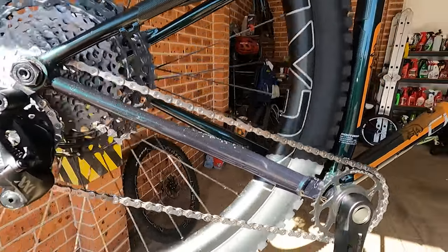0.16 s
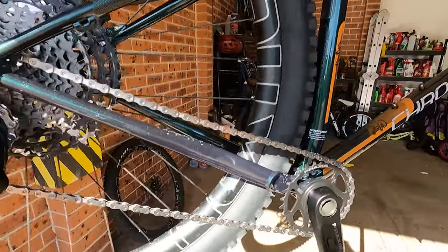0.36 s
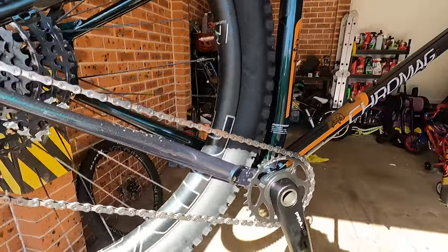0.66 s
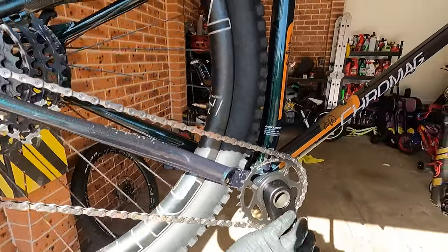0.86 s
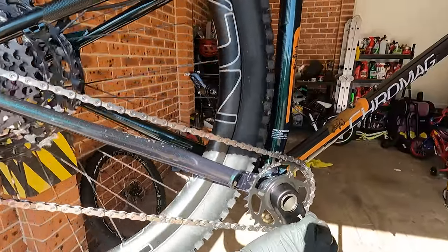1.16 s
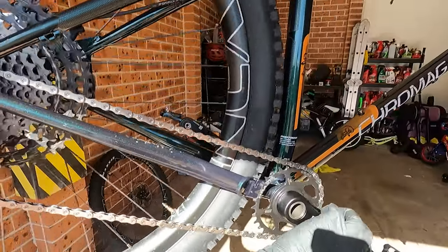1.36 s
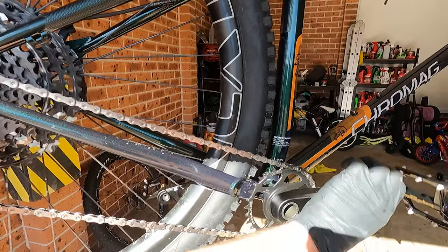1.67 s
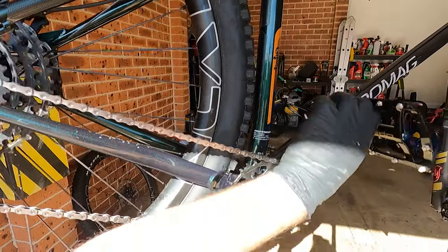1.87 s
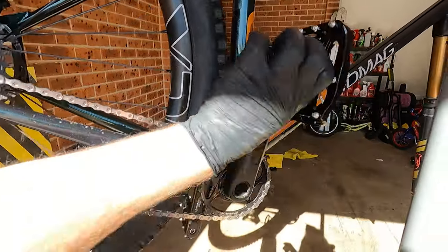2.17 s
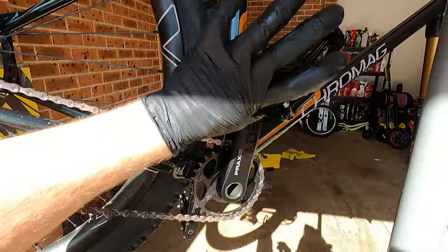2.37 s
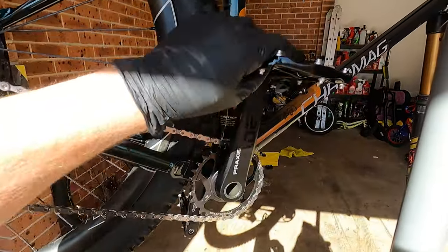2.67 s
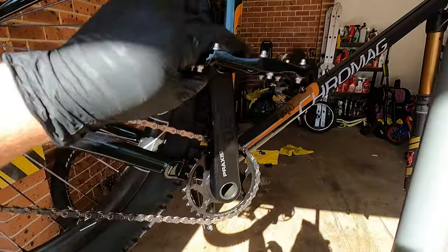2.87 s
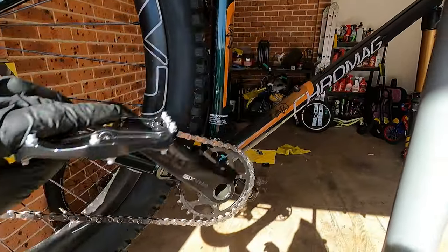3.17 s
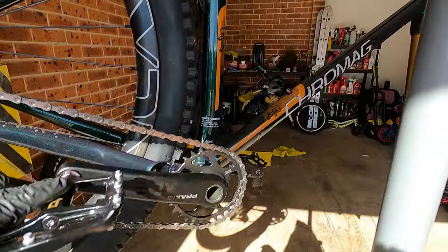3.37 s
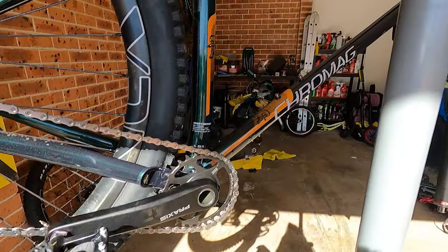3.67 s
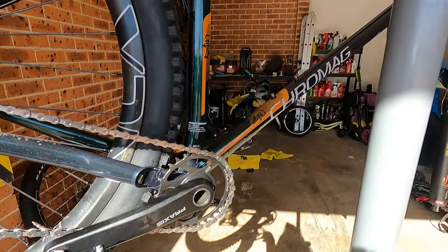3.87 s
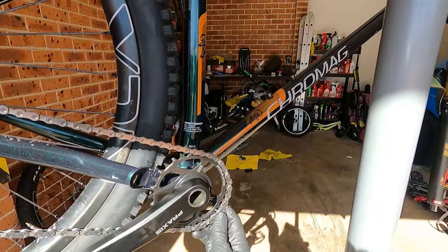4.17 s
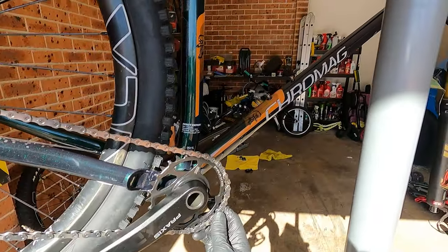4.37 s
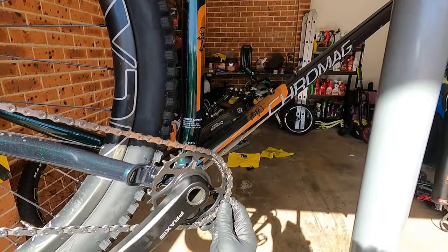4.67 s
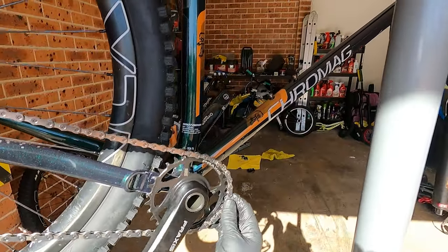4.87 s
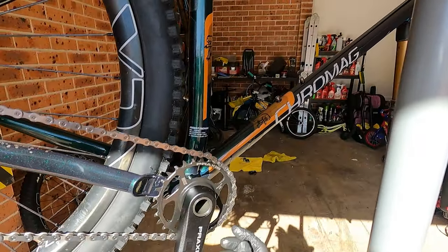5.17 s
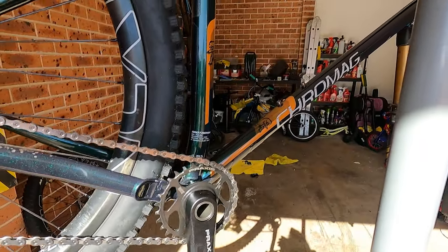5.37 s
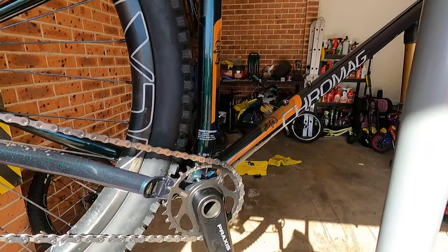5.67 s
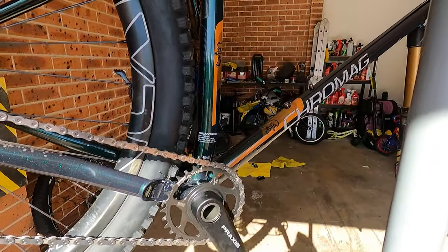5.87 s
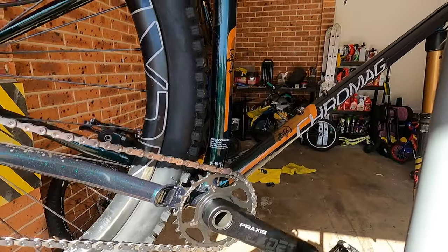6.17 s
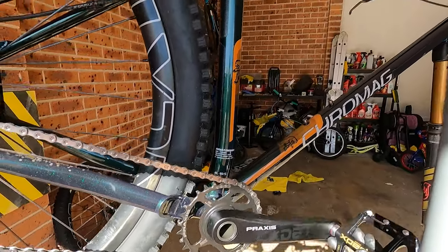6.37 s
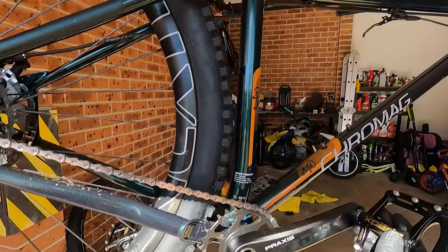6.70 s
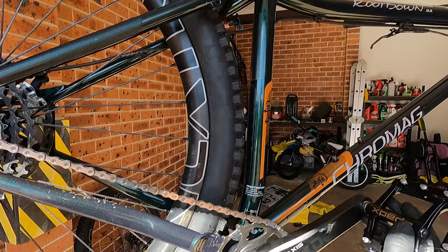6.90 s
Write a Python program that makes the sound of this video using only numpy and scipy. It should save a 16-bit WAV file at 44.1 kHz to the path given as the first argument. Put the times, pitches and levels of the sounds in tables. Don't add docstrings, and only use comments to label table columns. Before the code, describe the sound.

A bicycle hub is heard close up in stereo at a garage mouth. Bright, hard metallic clicks start at once, buzzing at about 60 to 80 a second and slowing by 0.6 s. Slower separate clicks, around 20 a second, follow until 1.25, then a long fast purr runs to 2.4, with a dull knock near 2.2. A gap holds only tiny ticks around 2.75. From 2.85 the clicking speeds up, then slows by 3.8; sparse clicks continue to 4.4. After another pause, strokes resume at 4.67, 5.16 and 5.7 at moderate speed, with a low frame hum at 5.2. The last run from 6.04 is faster and closer, slackening by 7.0. Soft low bumps and breezy grip rumble increase after 4.8, heaviest near 6.5. Short garage reverberation and faint street air lie beneath.

```python
import sys
import numpy as np
from scipy import signal
from scipy.fft import rfft, irfft
from scipy.io import wavfile
from scipy.ndimage import uniform_filter1d

SR = 44100
rng = np.random.default_rng(int(sys.argv[2]) if len(sys.argv) > 2 else 0)


def output_pcm(signal):
    pcm = np.clip(np.atleast_2d(signal).T, -1, 1) * 32767
    wavfile.write(sys.argv[1], SR, np.round(pcm).astype(np.int16))


def makeup_ratio(level_db):
    decades = np.asarray(level_db, float) / 20
    return 10 ** decades


N = 310464
BAND_EDGES_HZ = 320 * 2 ** np.arange(0, 6.1, 1 / 3)

# (frequency [Hz], density [dB per Hz])
STREET_SPECTRUM = [(88, -67), (150, -13), (244, -12.5), (283, -15.5), (565, -12.5), (790, -15),
                   (1280, -11.5), (4830, -26), (13000, -51)]
# (time [s], level [dB])
AIR_SWELL = [(0, -1), (2.42, 6.5), (2.66, 4), (2.72, 0), (3.5, 9), (4.45, 5), (4.64, 3), (7.04, 5)]
# (time [s], level [dB])
GRIP = [(0, -54), (.17, -53), (.4, -50.5), (3.37, -54.5), (3.47, -51), (3.85, -47), (3.95, -56.5),
        (4.68, -51.5), (4.85, -38.5), (5.08, -43.5), (5.5, -48.5), (5.8, -37.5), (6.2, -47.5),
        (6.33, -33.5), (6.53, -30), (6.62, -41.5), (6.8, -35.5), (7.04, -38.5)]
# (frequency [Hz], side against mid [dB])
NOISE_WIDTH = [(30, -4.5), (125, -2.5), (250, -5), (600, -11), (5000, -11), (13000, -4)]
# (time [s], peak [dB], frequency [Hz], push + or pull - [ratio])
BUMPS = [(4.781, -20, 84, 0.79), (5.197, -16.5, 44.4, 0.57), (5.583, -23.5, 51.3, 0.82),
         (5.682, -17, 50, -0.44), (5.805, -24, 41.6, 0.83), (6.315, -19, 117, -0.8),
         (6.318, -14.5, 209, 0.69), (6.517, -18.5, 260, 1), (6.513, -6.5, 60.6, -0.53),
         (6.784, -15.5, 42.5, 0.84), (7.019, -12.5, 139, 0.96)]
# (time [s], peak [dB], knock [dB])
JOLTS = [
    (0.498, -36, -4.5),
    (1.42, -40, -4),
    (2.178, -50, 14.5),
    (3.968, -40, -20),
    (5.201, -31, -4),
    (5.722, -32, 0),
    (6.313, -34.5, -25),
    (6.516, -38.5, -13),
    (7.02, -32, -15.5),
]
# (frequency [Hz], level [dB], t60 [s])
FRAME_MODES = [(143.8, 1, 0.91), (298.6, -9.5, 0.35), (452, -12.5, 0.29)]
# (frequency [Hz], t60 [s])
GARAGE_T60 = [(700, 0.52), (2000, 0.68), (5000, 0.6), (9000, 0.51), (14000, 0.35)]
# (time [s], nearness [dB], turn from -1 rim-on to 1 face-on [ratio])
VIEW = [(0, 0.5, 1.4), (.3, 0, 0.52), (.55, 1.7, 0.34), (1.2, 0.1, -0.48), (1.7, 1.25, -0.63),
        (2.12, -0.1, 0), (2.38, -4, 1.04), (2.8, -3.5, 1.1), (3.15, 1.05, -0.62), (3.65, -0.7, 1),
        (4.2, 2, 0.39), (4.42, -4, 1.26), (4.66, 0.3, 0.23), (5.1, 0.5, 0.28), (5.4, .5, 0.51),
        (5.9, 0.5, 0.23), (6.62, 5, -0.25), (6.9, 4.5, 0.94)]
# (frequency [Hz], t60 [s])
HUB_MODES = [(960, .08), (1010, .05), (1617, .08), (1735, .045), (1810, .11), (1860, .05), (1927, .09),
             (2035, .08), (2101, .12), (2423, .12), (2466, .12), (2530, .12), (2596, .13), (2699, .07),
             (2852, .13), (3043, .1), (3548, .08), (4285, .08), (5620, .06), (5797, .065), (5857, .05),
             (6670, .04), (7870, .05), (8850, .04), (10590, .04), (12000, .008)]
HUB_MODE_DB = [-14.5, -11, -33, -6, -12, -9.5, -10, -13.5, -9.5, -23, -14, -25.5, -23, -15, -25.5, -15, -9,
               -18.5, -11, -9.5, -16, -9.5, -12, -10, -38, 3]
# (frequency [Hz], density [dB per Hz])
SNAP_SPECTRUM = [(400, -20.5), (850, -18.5), (970, -7.5), (1300, -13.5), (1800, 2), (2240, -3.5), (2600, 3),
                 (3250, -5), (4600, 4), (5450, -2), (5800, 2), (6250, -2.5), (12000, -9.5), (15600, -26)]
# (frequency [Hz], t60 [s])
SNAP_T60 = [(700, 0.25), (2000, 0.39), (4500, 0.091), (8000, 0.099), (14000, 0.025)]
# (frequency [Hz], side [dB])
SNAP_SPREAD = [(800, -8), (4000, -20), (8000, -11), (11000, -9), (15000, 3.5)]
# (time [s], peak [dB])
TICKS = [
    (2.7373, -62),
    (2.7544, -64),
    (2.7665, -46.5),
]
# (time [s], teeth since stroke began [count])
FIRST_TURN = [
    [(.0012, 0), (.0769, 4), (.172, 10), (.3395, 23), (.4002, 28), (.4816, 34), (.5451, 37), (.5767, 38),
     (.6232, 39)],
    [(.6495, 0), (.6732, 1), (.7592, 3), (.8432, 4), (.9088, 5), (1.0512, 7), (1.1203, 8), (1.1696, 9),
     (1.2454, 11)],
    [(1.2723, 0), (1.3512, 4), (1.4288, 9), (1.6263, 24), (1.8084, 37), (2.1436, 61), (2.1589, 62),
     (2.3295, 68), (2.3797, 69)],
]
SECOND_TURN = [
    [(2.8391, 0), (2.8707, 1), (2.9305, 3), (2.9554, 4), (3.0022, 6), (3.1923, 17), (3.3508, 27),
     (3.7328, 43), (3.772, 44)],
    [(3.8297, 0), (3.8908, 1), (3.9564, 2), (4.1167, 5), (4.2457, 7), (4.3127, 8), (4.4073, 9)],
]
THIRD_TURN = [
    [(4.667, 0), (4.7412, 1), (4.7858, 2), (4.8177, 3), (4.8456, 4), (4.9004, 6), (5.0651, 12),
     (5.0985, 13), (5.1303, 14)],
    [(5.1568, 0), (5.1823, 2), (5.2005, 3), (5.2495, 6), (5.3412, 10), (5.415, 13), (5.5029, 16),
     (5.5483, 17), (5.6031, 18)],
    [(5.6893, 0), (5.7502, 2), (5.8301, 5), (5.8812, 7), (6.0025, 11)],
    [(6.039, 0), (6.0968, 2), (6.1785, 6), (6.4538, 21), (6.4732, 22), (6.6433, 29), (6.9287, 37),
     (6.9612, 38), (7.0321, 40)],
]
STROKE_DB = [-1.4, .5, 0.022, 0.61, -1.24, -0.12, 1.7, 0.5, -1.76]
# (frequency [Hz], left minus right [dB])
MIC_TILT = [(60, -1.0), (250, -2.5), (500, 0.0), (950, 0.0), (2380, 0.5), (5980, 1.5), (9500, 2.5),
            (14000, 0.0)]
# (frequency [Hz], gain [dB])
TOP_CUT = [(15650, 0), (15900, -45)]
# (lower edge [Hz], threshold [dB])
TOP_GATES = [(14000, -72), (12700, -74)]


def in_time(rows):
    s, *columns = np.transpose(rows)
    return [np.interp(np.arange(N) / SR, s, c) for c in columns]


def at_hz(points, hz):
    table_hz, value = np.array(points).T
    return np.interp(np.log(hz), np.log(table_hz), value)


def rms_one(x):
    return x / np.sqrt(np.mean(x ** 2) + 1e-20)


def coloured(x, spectrum):
    x = np.asarray(x)
    size = x.shape[-1]
    hz = np.maximum(np.arange(size // 2 + 1) * SR / size, 1)
    return irfft(rfft(x) * makeup_ratio(at_hz(spectrum, hz)), size)


def lift(x, band, gain_db):
    return x + coloured(x, band) * (makeup_ratio(gain_db) - 1)


def train(at, size):
    return np.bincount(at.ravel(), size.ravel(), N)


def ring(impulses, hz, t60_s):
    r = makeup_ratio(-60 / (t60_s * SR))
    w = 2 * np.pi * hz / SR
    return signal.lfilter([0, np.sin(w)], [1, -2 * r * np.cos(w), r * r], impulses + 1e-18)


def dying_noise(t60s, size, channels):
    white = rng.standard_normal((2, channels, size))
    t = np.arange(size) / SR
    out = 0
    for k, (low, high) in enumerate(zip(BAND_EDGES_HZ, BAND_EDGES_HZ[1:])):
        bandpass = signal.butter(2, [low, high], "band", fs=SR, output="sos")
        band = signal.sosfilt(bandpass, white[k % 2])
        out = out + band * makeup_ratio(-60 * t / at_hz(t60s, np.sqrt(low * high)))
    return out / np.sqrt(np.sum(out ** 2, axis=1, keepdims=True))


def pair_noise(spectrum):
    mid, side = coloured(rng.standard_normal((2, N)), spectrum)
    side = coloured(side, NOISE_WIDTH)
    return rms_one(np.array([mid + side, mid - side]))


def street():
    return makeup_ratio(-57 + in_time(AIR_SWELL)[0]) * pair_noise(STREET_SPECTRUM)


def lumps():
    knots = rng.standard_normal(200)
    return np.interp(np.arange(N) / SR * 12, np.arange(200), knots)


def rumble():
    lump_db = 2.5
    grip_db, = in_time(GRIP)
    deep = pair_noise([(12, 5.0), (25, 3.0), (48, 7.5), (90, -3.0), (140, -13.5), (300, -72)])
    upper = pair_noise([(60, -19), (110, -8), (155, 5), (250, -4.5), (400, -6.5), (800, -63), (2000, -70)])
    deep_db = grip_db + 5.5 + lump_db * lumps()
    upper_db = -54 + 0.34 * (grip_db - grip_db.min()) + .5 * lump_db * lumps()
    return makeup_ratio(deep_db) * deep + makeup_ratio(upper_db) * upper


def bumps():
    out = np.zeros(N)
    for s, peak_db, hz, way in BUMPS:
        push = train(np.array([int(s * SR)]), way * makeup_ratio([peak_db]))
        out += ring(push, hz, 3.5 / hz)
    return out


def frame():
    s, peak_db, knock_db = np.transpose(JOLTS)
    at = (s * SR).astype(int)
    hum = sum(ring(train(at, makeup_ratio(peak_db + db - 4.5)), hz, t60_s) for hz, db, t60_s in FRAME_MODES)
    puff = signal.lfilter([1], [1, -makeup_ratio(-60 / (.08 * SR))], train(at, makeup_ratio(peak_db + knock_db)))
    bandpass = signal.butter(2, [150, 900], "band", fs=SR, output="sos")
    knock = signal.sosfilt(bandpass, rng.standard_normal(N))
    return hum + puff * rms_one(knock)


def garage(x):
    tail = dying_noise(GARAGE_T60, size=40000, channels=2)
    tail = np.pad(tail, ((0, 0), (300, 0)))
    return makeup_ratio(-11) * signal.fftconvolve(x[None], tail, axes=1)[:, :N]


def drops(stroke):
    s, teeth = np.transpose(stroke)
    tooth = np.arange(teeth[-1] + 1)
    slope = np.gradient(s, teeth, edge_order=2)
    i = np.minimum(np.searchsorted(teeth, tooth, "right") - 1, len(s) - 2)
    step, gap = np.diff(teeth)[i], np.diff(s)[i]
    u = (tooth - teeth[i]) / step
    bend = (1 - u) * (slope[i] * step - gap) - u * (slope[i + 1] * step - gap)
    at = s[i] + u * gap + u * (1 - u) * bend
    return np.transpose([at, 1 / np.gradient(at)])


def clicks():
    drop_db, db_per_doubling = -24.5, 1
    scatter_db, scatter_s = .7, .0003
    strokes = [drops(stroke) for stroke in FIRST_TURN + SECOND_TURN + THIRD_TURN]
    s, rate = np.concatenate(strokes).T
    speed = np.log2(rate / 40)
    scatter = rng.standard_normal((2, len(s)))
    force_db = np.repeat(STROKE_DB, [len(p) for p in strokes])
    level_db = drop_db + force_db + db_per_doubling * speed + scatter_db * scatter[0]
    dropped = list(zip(s + scatter_s * scatter[1], level_db))
    return dropped, in_time(np.transpose([s, speed]))[0]


def contacts(events, spread_s, bounce_db, count):
    s, level_db = np.transpose(events)
    draw = rng.random((len(s), 3 * count)).reshape(-1, 3, count)
    late_s = spread_s * -np.log(1 - draw[:, 0])
    late_s[:, 0] = .0009
    size = makeup_ratio(bounce_db + 2 * draw[:, 1]) * np.sign(draw[:, 2] - .5)
    size[:, 0] = 1
    size *= makeup_ratio(level_db[:, None]) / np.linalg.norm(size, axis=1, keepdims=True)
    at = ((s[:, None] + late_s - .0004) * SR).astype(int)
    return np.clip(at, 0, N - 1), size


def sprockets(at, size):
    swell_s, crack_db, teeth_per_position = .0006, 27.5, 3
    crack_t60 = [(700, .022), (4000, .014), (15000, .022)]
    response = makeup_ratio(26) * dying_noise(SNAP_T60, size=9000, channels=8)
    response[:, :1500] += makeup_ratio(crack_db) * dying_noise(crack_t60, size=1500, channels=8)
    response *= 1 - np.exp(-np.arange(9000) / (swell_s * SR))
    response[:, 40] += makeup_ratio(11)
    away = (np.arange(len(at))[:, None] / teeth_per_position - np.arange(8) + 4) % 8 - 4
    share = np.cos(np.pi / 2 * np.clip(away, -1, 1))
    return sum(signal.fftconvolve(train(at, size * share[:, [k]]), response[k])[:N] for k in range(8))


def radiated(x, spectrum):
    hz = np.maximum(np.arange(2049) * SR / 4096, 1)
    cepstrum = irfft(np.log(makeup_ratio(at_hz(spectrum, hz))))
    cepstrum[1:2048] *= 2
    cepstrum[2049:] = 0
    response = irfft(np.exp(rfft(cepstrum)))
    return signal.fftconvolve(x, response[None], axes=1)[:, :N]


def ratchet(near_db, turn):
    dropped, speed = clicks()
    at, size = contacts(dropped + TICKS, spread_s=.002, bounce_db=-16.0, count=12)
    strengths = makeup_ratio(HUB_MODE_DB + 1.5 * rng.standard_normal((len(at), len(HUB_MODES))))
    size = size * makeup_ratio(near_db[at])
    modes = sum(ring(train(at, size * strengths[:, [k]]), hz, t60_s)
                for k, (hz, t60_s) in enumerate(HUB_MODES))
    hub = radiated(np.array([sprockets(at, size) + modes, sprockets(at, size)]), SNAP_SPECTRUM)
    low = [(1100, -8), (1500, -8), (1680, 0), (1880, 0), (2050, -12), (2300, -60)]
    hub = lift(hub, low, 6 * turn)
    hub = lift(hub, [(2100, -60), (2300, 0), (2850, 0), (3100, -60)], -0.5 - 0.5 * turn)
    hub = lift(hub, [(5000, -40), (9000, 0)], 2 * speed)
    return hub[0], coloured(hub[1], SNAP_SPREAD)


def scene():
    near_db, turn = in_time(VIEW)
    hub, unlike = ratchet(near_db, turn)
    pan_db = -0.35 + 0.1 * turn
    direct = (hub + frame() + unlike * [[1], [-1]]) * makeup_ratio(np.outer([.5, -.5], pan_db))
    grip = bumps() * makeup_ratio([[-1], [1]])
    return direct + garage(hub) + grip + rumble() + street()


def band_limit(x):
    return signal.sosfilt(signal.butter(12, 15780, fs=SR, output="sos"), x)


def record(dry):
    left = coloured(dry[0], [(hz, db / 2) for hz, db in MIC_TILT])
    right = coloured(dry[1], [(hz, -db / 2) for hz, db in MIC_TILT])
    heard = coloured([left, right], TOP_CUT)
    for hz, gate_db in TOP_GATES:
        top = coloured(heard, [(.98 * hz, -60), (hz, 0)])
        power = uniform_filter1d(np.mean(top ** 2, axis=0), size=700)
        faint = power < makeup_ratio(2 * gate_db)
        heard = heard - top * uniform_filter1d(faint * 1., size=200)
    return band_limit(heard)


dry = scene()
out = record(dry)
output_pcm(out)
```